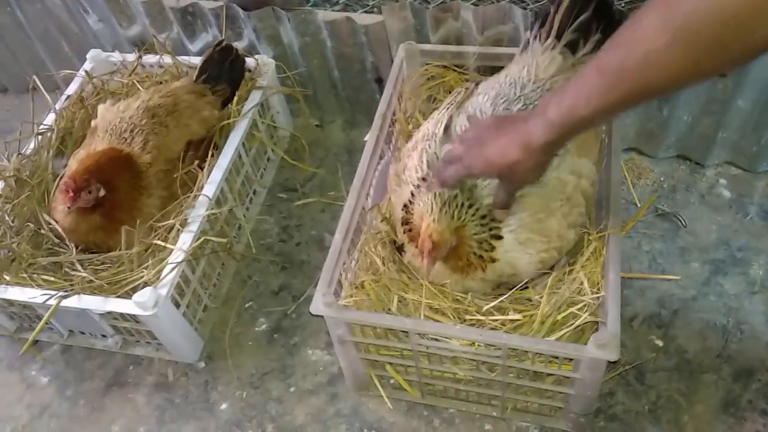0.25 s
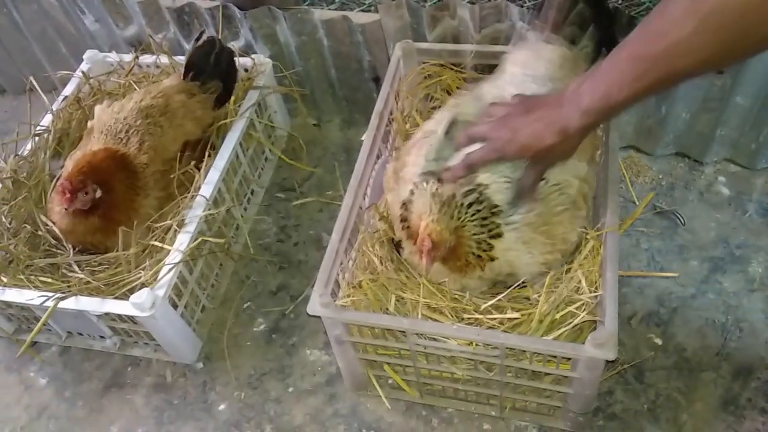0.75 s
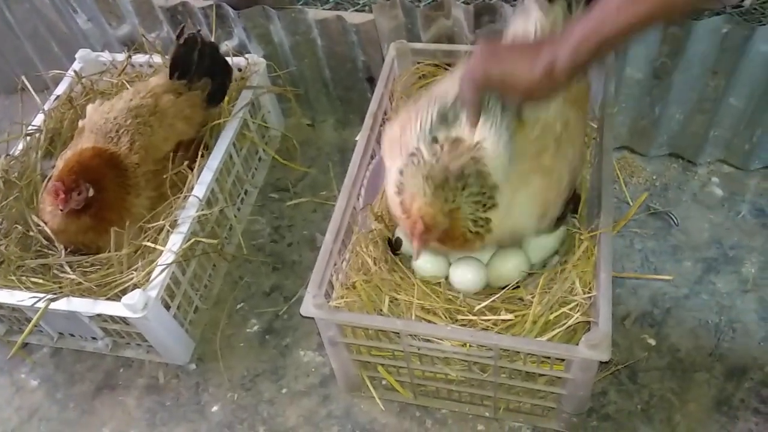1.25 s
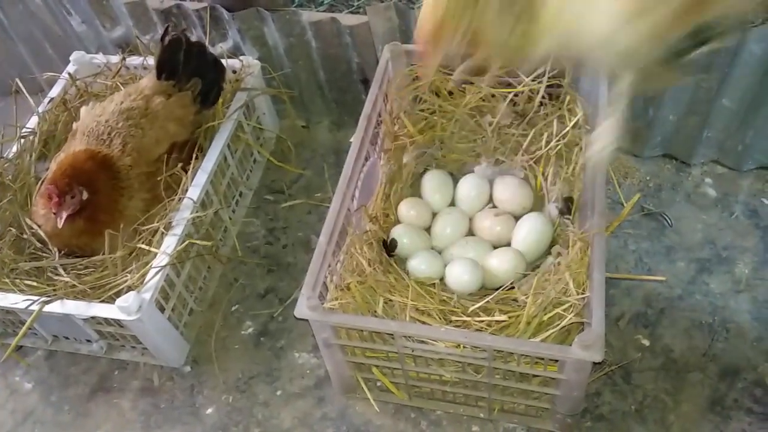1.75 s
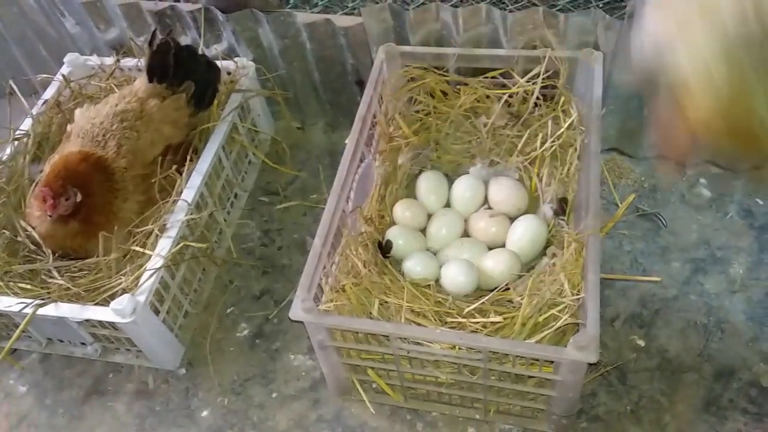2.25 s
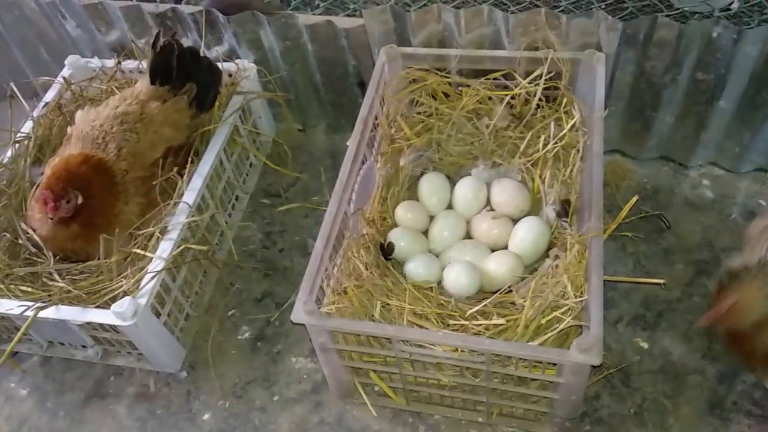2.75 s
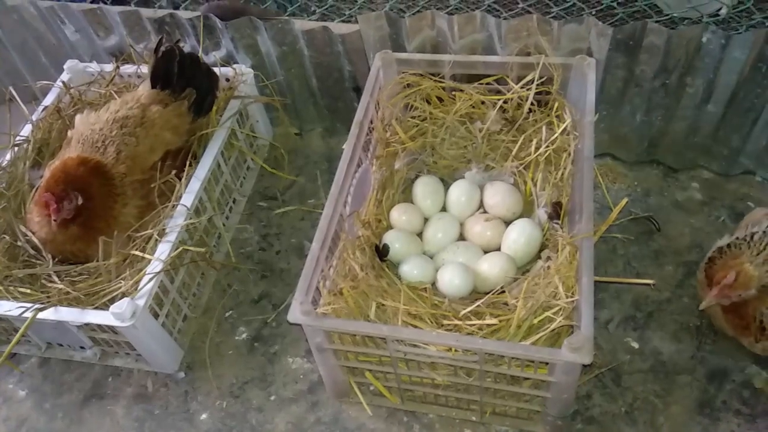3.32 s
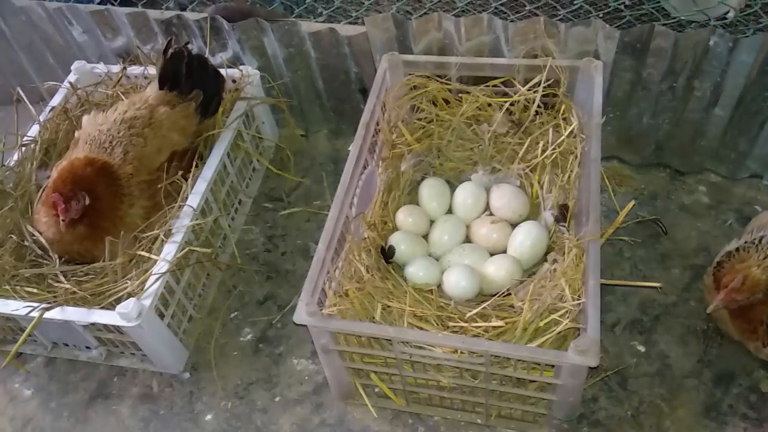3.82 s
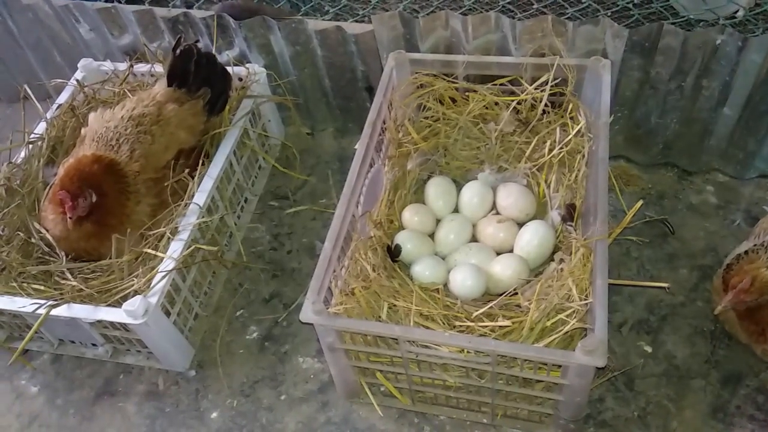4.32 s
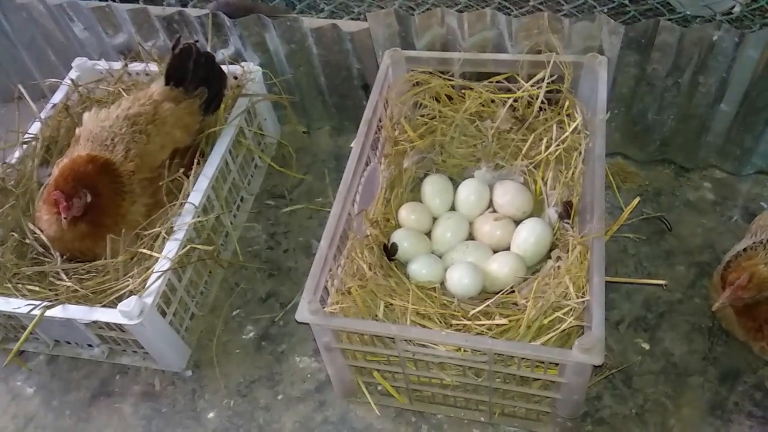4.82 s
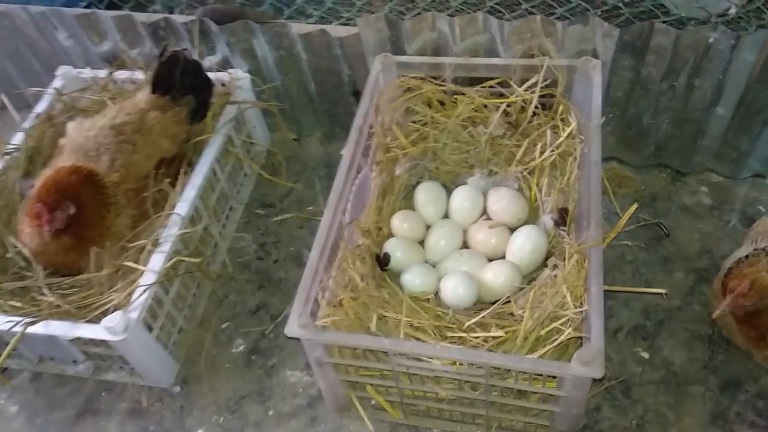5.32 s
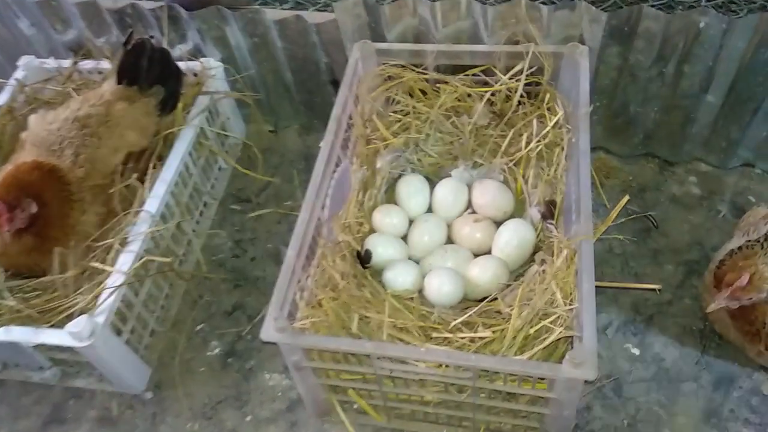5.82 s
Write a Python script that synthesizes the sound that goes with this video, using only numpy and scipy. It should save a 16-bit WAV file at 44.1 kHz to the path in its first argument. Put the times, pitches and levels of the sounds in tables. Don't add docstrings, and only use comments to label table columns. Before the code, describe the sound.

Loud cracking hen squawks for two seconds, then sparse quiet clucks under nonstop chick peeping, in an echoing sheet-metal shed.

```python
import sys
import numpy as np
from scipy import signal
from scipy.io import wavfile

SR = 44100
rng = np.random.default_rng(int(sys.argv[2]) if len(sys.argv) > 2 else 0)


def decibels_to_gain(level_db):
    exponent = np.asarray(level_db, float) / 20
    return 10 ** exponent


def inscribe(sig):
    pcm = np.round(np.clip(np.atleast_2d(sig).T, -1, 1) * 32767)
    wavfile.write(sys.argv[1], SR, pcm.astype(np.int16))


N = 267687

# time_s, pitch_hz, level_db
SQUAWKS = [
    [(0, 1745, -16), (.058, 1600, -13.5), (.095, 1512, -14.5), (.13, 1632, -12), (.18, 1486, -15.5),
     (.235, 1268, -19), (.27, 1248, -28), (.36, 1237, -24.5), (.41, 1197, -40)],
    [(.56, 1587, -35), (.61, 1577, -25), (.69, 1714, -29)],
    [(.835, 1148, -24), (.91, 1223, -23), (.945, 1418, -17.5), (.975, 1702, -14.5), (1.05, 1715, -18),
     (1.12, 1669, -17.5), (1.165, 1351, -20.5), (1.18, 1229, -26), (1.245, 1154, -32)],
    [(1.36, 1547, -27), (1.385, 1254, -22.5), (1.415, 780, -39)],
    [(1.53, 1528, -31), (1.58, 1759, -28.5), (1.625, 1924, -21), (1.69, 1900, -38), (1.76, 1700, -20.5),
     (1.815, 1785, -16.5), (1.852, 1357, -17), (1.87, 1273, -21), (1.94, 1280, -39)],
    [(1.98, 1689, -30), (2.02, 1694, -25), (2.1, 1640, -34), (2.13, 1288, -28), (2.22, 1203, -41.5)],
]
# hoarseness_at_top (0-1), crack_below_hz, flutter_per_s
HOARSENESS = [
    (.2, 1700, 28.5),
    (.3, 1500, 28),
    (.5, 1550, 60),
    (.2, 1300, 28),
    (.15, 1400, 28),
    (.5, 1400, 28),
]
# time_s, depth (0-1)
CATCHES = [(0.035, 0.19), (.072, 0.77), (.107, 0.87), (.143, 1), (0.167, 0.85), (0.191, 0.9), (0.223, 0.86),
           (0.251, 0.77), (0.287, 0.74), (0.316, 0.62), (.352, 0.65), (.62, 0.2), (.862, 0.8),
           (0.896, 0.68), (.925, 0.7), (0.976, 0.95), (1.002, 0.28), (1.023, 0.22), (1.055, 0.79),
           (1.074, 0.51), (1.093, 0.9), (1.129, 0.68), (1.151, 0.74), (1.188, 0.9), (1.214, 0.78),
           (1.765, 0.27), (1.861, 0.64), (1.895, 0.6), (2.061, 0.66), (2.109, 0.5), (2.162, 0.82)]
# centre_hz, width_hz, gain_db
BEAK_RESONANCE = (2780, 220, 2.2)
# time_s, peak_db, pitch_hz, upper_partials_db
CLUCKS = [(0.736, -32.5, 881, -18), (1.53, -42.5, 760, -18), (1.565, -43, 657, -18), (2.09, -32, 875, -17),
          (2.378, -27, 739, 3), (2.46, -32, 822, -18), (2.761, -30, 847, -18), (3.089, -35.5, 914, -3),
          (3.374, -36, 838, -22), (3.71, -36.5, 842, -20), (4.181, -36.5, 817, -22),
          (4.499, -37.5, 862, -1), (4.869, -41.5, 741, -8), (5.478, -37, 827, -3), (5.84, -33.5, 825, -18)]
# time_s, pitch_hz, level_db
FAR_MOAN = [
    (0.27, 321, -60),
    (0.384, 305.4, -46.5),
    (0.56, 229, -49),
]
# start_s, length_s, first_hz, level_db
RISING_PEEPS = [(.008, 0.04, 2720, -17.5), (.534, 0.11, 2610, -28.5), (.562, 0.073, 3720, -24),
                (.722, 0.16, 2437, -24), (.783, 0.13, 2423, -20.5), (.976, 0.082, 2797, -18.5),
                (1.037, 0.043, 3540, -19.5), (1.158, 0.093, 3015, -27), (2.621, 0.076, 2730, -21.5),
                (2.65, 0.1, 2270, -23.5), (2.87, 0.018, 2620, -12), (2.997, 0.11, 2900, -20.5),
                (3.55, .13, 3500, -23), (3.781, 0.072, 2864, -19.5), (3.814, 0.093, 3560, -29),
                (4.501, 0.12, 2267, -23.5), (4.841, 0.052, 2974, -19.5), (4.998, 0.097, 2580, -21),
                (5.067, 0.14, 2998, -19), (5.521, 0.088, 2524, -26.5), (5.673, 0.061, 2694, -22.5)]
# start_s, length_s, first_hz, level_db
FALLING_PEEPS = [(.005, 0.036, 3270, -20.5), (1.051, 0.13, 3000, -21.5), (1.097, 0.054, 3350, -23),
                 (1.443, 0.055, 3780, -21.5), (1.445, 0.074, 2730, -20.5), (1.453, 0.03, 3090, -16.5),
                 (1.502, 0.068, 3004, -19), (1.828, 0.074, 3030, -24), (2.102, 0.14, 2663, -26.5),
                 (2.115, 0.1, 3070, -21), (2.378, 0.022, 2830, -18.5), (2.406, 0.044, 3750, -19.5),
                 (2.47, 0.14, 3200, -24), (2.73, 0.039, 3063, -15.5), (3.141, 0.13, 2860, -20.5),
                 (3.322, 0.091, 3036, -16.5), (3.334, 0.069, 2750, -23), (3.374, 0.079, 3184, -20.5),
                 (3.48, 0.081, 3140, -23), (3.525, 0.027, 3170, -21), (3.564, 0.11, 3086, -18.5),
                 (3.63, 0.068, 4070, -26), (3.664, 0.062, 3250, -23), (4.02, 0.099, 2720, -24),
                 (4.371, 0.02, 2760, -15), (4.405, 0.1, 2840, -19), (5.159, 0.12, 2945, -20.5),
                 (5.409, 0.22, 2670, -28.5)]
# start_s, length_s, pitch_hz, level_db
LEVEL_PEEPS = [(.367, 0.025, 3270, -28), (.431, 0.024, 3210, -22), (1.525, 0.04, 3405, -18.5),
               (3.042, .039, 2740, -22.5), (3.163, 0.18, 3880, -26.5), (3.215, 0.023, 3190, -17),
               (3.25, 0.14, 2943, -19), (3.287, 0.098, 2580, -19), (3.596, 0.051, 2705, -27),
               (3.891, 0.22, 2960, -21), (4.34, 0.071, 3140, -18.5), (4.418, 0.064, 3786, -23.5),
               (4.477, 0.05, 3086, -11.5), (4.614, 0.091, 2737, -24), (4.947, 0.062, 2825, -23),
               (5.791, 0.14, 2935, -24.5), (5.969, 0.077, 2895, -19.5)]
# start_s, length_s, pitch_hz, level_db
CLEAR_PEEPS = [(0.035, 0.046, 2080, -24.5), (2.397, .022, 3460, -27), (2.144, 0.026, 2340, -23),
               (1.197, 0.052, 3340, -26), (3.03, 0.024, 3820, -27), (3.718, 0.047, 3490, -28),
               (3.862, 0.022, 2256, -24.5), (4.256, .022, 2690, -32), (4.303, .03, 4380, -30),
               (4.505, 0.11, 3480, -33), (5.452, 0.043, 3960, -33), (5.525, 0.036, 3490, -36),
               (5.66, 0.047, 4480, -30.5), (5.91, 0.044, 6200, -28), (5.993, 0.067, 3950, -30),
               (6.023, 0.031, 4070, -29)]
# start_s, level_db
PLUNGES = [
    (1.54, -22),
    (2.845, -21),
    (4.955, -16),
]
# start_s, length_s, second_partial_db
BRIGHT_PEEPS = [(0.24, 0.024, -10), (0.263, 0.075, -22.5), (0.366, 0.025, -13.5), (0.385, 0.045, -22),
                (0.431, 0.032, -16.5), (1.056, 0.082, -30.5), (1.314, 0.022, -13), (1.88, 0.041, -22),
                (2.568, 0.026, -21), (2.631, 0.046, -20.5), (2.723, 0.032, -19), (2.977, 0.076, -24.5),
                (4.254, 0.023, -8.5), (4.289, 0.061, -19.5), (4.833, 0.032, -20)]
# start_s, length_s, pitch_hz, level_db
HIGH_PEEPS = [(0.924, 0.077, 4260, -21.5), (1.143, 0.077, 4025, -20), (2.425, 0.064, 4465, -19.5),
              (2.902, 0.034, 5070, -14.5), (2.94, 0.034, 4950, -22), (4.177, 0.064, 4400, -29.5),
              (4.844, .044, 4120, -24), (4.874, 0.091, 4090, -22.5), (4.902, 0.038, 4130, -34)]
# start_s, length_s, pitch_hz, peak_db
PIPING = [
    (1.31, .2, 5750, -28),
    (2.03, .33, 5700, -35),
    (2.58, .08, 5680, -28),
    (3.26, .68, 5700, -34),
    (5.825, .07, 5700, -30),
]
# start_s, length_s, lowest_hz, level_db
BUZZES = [(0, 0.07, 5370, -19.5), (0.526, 0.053, 5410, -13), (0.641, 0.073, 5880, -11),
          (1.316, 0.005, 5600, -13), (1.375, 0.031, 5400, -43), (1.634, 0.12, 5410, -12.5),
          (1.838, 0.047, 5420, -22), (2.397, 0.04, 5900, -39), (2.586, 0.017, 5270, -15),
          (2.779, 0.023, 5620, -13), (3.262, 0.034, 5580, -19), (3.444, 0.0079, 5300, -20),
          (3.493, 0.012, 5350, -11), (3.835, 0.17, 6000, -44), (3.938, 0.054, 5020, -17),
          (4.223, 0.063, 5640, -22), (4.632, 0.089, 5040, -16.5), (4.797, 0.085, 6200, -21),
          (5.044, 0.11, 5710, -15.5), (5.61, 0.053, 5870, -19), (5.734, 0.12, 4580, -28),
          (5.889, 0.049, 5180, -24), (6.052, 0.032, 5600, -16)]
# start_s, length_s, pitch_hz, level_db
FURTHER_PEEPS = [(0.196, 0.082, 3015, -31), (0.231, 0.031, 6050.0, -28), (0.241, 0.1, 6810, -31.5),
                 (0.429, 0.056, 5870.0, -29), (0.603, 0.088, 2760, -32), (0.64, 0.038, 6760.0, -21),
                 (0.738, 0.052, 6900, -30), (0.804, 0.028, 2124, -25.5), (0.996, 0.052, 3060, -25),
                 (1.116, 0.049, 3150, -27), (1.257, 0.13, 5770, -27), (1.448, 0.063, 5250, -30),
                 (1.506, 0.044, 3110, -20.5), (1.595, 0.058, 5550, -29), (1.663, 0.07, 7700, -28),
                 (1.712, 0.094, 2150, -34), (1.787, 0.047, 5830, -26), (1.855, 0.059, 1910, -29),
                 (1.884, 0.079, 7100, -30), (2.396, 0.2, 9000, -30.5), (2.612, 0.058, 5440, -36),
                 (2.661, 0.075, 2150, -32), (2.727, 0.11, 9130, -28.5), (2.8, 0.038, 5960.0, -25),
                 (2.839, 0.024, 2820, -27), (2.889, 0.081, 4220.0, -33), (3.004, 0.14, 3750.0, -34),
                 (3.102, 0.06, 2800.0, -27), (3.187, 0.094, 2330.0, -29), (3.323, 0.071, 2220, -32),
                 (3.439, 0.031, 6080.0, -32), (3.593, 0.061, 3400, -27), (3.756, 0.019, 5660, -22.5),
                 (3.782, 0.14, 3680, -29), (3.856, 0.058, 2540, -27.5), (3.969, 0.039, 5620, -26.5),
                 (4.667, 0.13, 2900, -30), (4.67, 0.12, 5720.0, -26), (4.833, 0.095, 4540.0, -31),
                 (4.865, 0.078, 3650, -28), (4.867, 0.046, 6730, -27), (4.957, 0.046, 2390, -25),
                 (5.004, 0.031, 2330.0, -29), (5.039, 0.056, 3450, -25.5), (5.135, 0.023, 2940, -24),
                 (5.75, 0.11, 2960, -30), (5.811, 0.11, 2615, -29.5), (6.048, 0.017, 3155, -21)]
# start_s, length_s, pitch_hz, level_db
FAR_CACKLE = [
    (2.319, 0.032, 1600, -36),
    (3.0, 0.1, 1370, -49),
    (3.97, 0.064, 1500, -42),
    (4.261, 0.0085, 1300, -33.5),
    (4.559, 0.044, 1740, -30.5),
    (5.956, 0.11, 1350, -41),
]
# lowest_hz, commonest_hz, highest_hz
FLOCK_HZ = (2313, 2916, 4580)
# time_s, flock_db, rustle_db
CROWD = [(0, -32, -33.5), (.3, -39, -34), (.8, -23.5, -32.5), (1.1, -33, -28), (1.28, -30.5, -33),
         (1.5, -28, -27), (1.75, -28.5, -34), (2.05, -32, -27.5), (2.33, -34, -34.5), (2.5, -27, -29.5),
         (3.4, -28, -31.5), (3.65, -25.5, -30.5), (4.15, -28.5, -39), (4.55, -27.5, -34.5),
         (5.0, -27.5, -34.5), (5.35, -35, -43), (5.5, -28.5, -34), (6.07, -27, -33)]
# frequency_hz, density_db (per Hz)
RUSTLE_SPECTRUM = [(250, -38), (700, -13), (1500, -14), (2500, 1), (4500, 1), (6500, 1), (8500, -3.5),
                   (10000, -1.5), (12000, -8.5), (15500, -12.5)]
# frequency_hz, density_db (per Hz)
AIR_SPECTRUM = [(15, -42), (25, -10), (135, -12.5), (243, -6), (515, -7.5), (1550, -1), (2000, 8),
                (2600, -59), (4400, -120)]
# start_s, peak_db
GUSTS = [(0.56, -36), (0.958, -63), (1.15, -33), (1.418, -39), (1.661, -42), (2.405, -33), (2.76, -46),
         (3.01, -43), (3.262, -39), (3.567, -31.5), (4.23, -50), (4.423, -33.5), (4.655, -47),
         (4.826, -34.5), (5.051, -45), (5.452, -47)]
# time_s, level_db
TRAFFIC = [(0, -91), (2.5, -77), (2.57, -46), (2.68, -53), (2.75, -72), (4.4, -80), (4.5, -51.5),
           (4.9, -42), (5.25, -50.5), (5.33, -81), (6.07, -64)]


def in_time(rows):
    s, *columns = np.transpose(rows)
    return [np.interp(np.arange(N) / SR, s, c) for c in columns]


def rms_one(x):
    return x / np.sqrt(np.mean(x ** 2) + 1e-20)


def drift(rate_hz, count=N):
    pole, run_in = np.exp(-2 * np.pi * rate_hz / SR), round(SR / rate_hz)
    white = rng.standard_normal(count + run_in)
    return rms_one(signal.lfilter([1], [1, -2 * pole, pole * pole], white)[-count:])


def bandpass(x, low_hz, high_hz, order=2):
    return signal.sosfilt(signal.butter(order, [low_hz, high_hz], "band", fs=SR, output="sos"), x)


def highpass_hen(x):
    return signal.sosfilt(signal.butter(4, 200, "high", fs=SR, output="sos"), x)


def add(out, start_s, sound):
    i = round(start_s * SR)
    out[i:i + len(sound)] += sound[:N - i]


def note(rows, edge_s):
    s, *columns = np.transpose(rows)
    t = np.arange(s[0], s[-1], 1 / SR)
    gate = np.clip(np.minimum(t - s[0], s[-1] - t) / edge_s, 0, 1)
    return t, gate, [np.interp(t, s, c) for c in columns]


def partials(hz, levels_db):
    phase = 2 * np.pi * np.cumsum(hz) / SR
    tone = 0
    for k, db in enumerate(levels_db, 1):
        tone = tone + decibels_to_gain(db) * np.sin(k * phase) * (k * hz < SR / 2)
    return np.sqrt(2) * tone


def squawks():
    catch_s, recover_s, catch_drop, catch_loss_db = .006, .003, .2, 11.0
    rasp_db, spit_db = -4.0, -10.0
    out = np.zeros(N)
    for rows, (top_hoarse, crack_hz, flutter_hz) in zip(SQUAWKS, HOARSENESS):
        t, gate, (steady_hz, db) = note(rows, 0.003)
        n = len(t)
        jerk, spit = np.zeros(n), np.zeros(n)
        for s, depth in CATCHES:
            jerk += depth * np.exp(-((t - s) / np.where(t < s, catch_s, recover_s)) ** 2)
            spit += depth * np.exp(-((t - s - .006) / 0.0068) ** 2)
        hoarse = np.interp(steady_hz, [1250, crack_hz], [.82, top_hoarse])
        tremble = (0.006 + 0.075 * hoarse) * drift(212, n) + .03 * hoarse * drift(flutter_hz, n)
        hz = steady_hz * (1 - catch_drop * jerk + tremble)

        group_hz = steady_hz / 4 * (1 + .03 * drift(40, n))
        grouped = 1 + .4 * hoarse ** 1.5 * partials(group_hz, [0, 0])
        low_hz = steady_hz / 4 * (1 + .02 * drift(60, n))
        first = grouped * partials(hz, [3]) + 1.3 * hoarse ** 2 * partials(low_hz, [-40, -7, -9])
        first = signal.sosfilt(signal.butter(8, 1.08 * steady_hz.max(), fs=SR, output="sos"), first)
        breath = decibels_to_gain(-catch_loss_db * jerk + (1.5 + 2.5 * hoarse) * drift(68, n))
        voice = breath * (first + partials(hz, [-60, -14, -40, -48]))

        rasp = rms_one(bandpass(rng.standard_normal(n), 720, 1650, order=3))
        hiss = rms_one(bandpass(rng.standard_normal(n), 9800, 11300))
        rasp_amount = hoarse ** 2 + 0.77 * jerk + .5 * spit
        turbulence = decibels_to_gain(rasp_db + 1.8 * drift(87, n)) * rasp_amount * rasp + decibels_to_gain(spit_db) * spit * hiss
        add(out, t[0], gate * decibels_to_gain(db - 6.0) * (voice + turbulence))
    hz, width_hz, db = BEAK_RESONANCE
    out += decibels_to_gain(db) * signal.lfilter(*signal.iirpeak(hz, hz / width_hz, fs=SR), out)
    return highpass_hen(out)


def clucks():
    lead_in_db = -47
    out = np.zeros(N)
    t = np.arange(round(.08 * SR)) / SR - .036
    closed = np.exp(-((t + 0.016) / 0.025) ** 2)
    opened = np.clip((t + 0.0067) / 0.0024, 0, 1) * np.exp(-(np.maximum(t, 0) / 0.022) ** 5)
    for s, db, hz, upper_db in CLUCKS:
        glide = np.clip(1 + 14 * t, .5, 1) - 1.17 * np.maximum(t, 0)
        pitch_hz = hz / 2 * (glide + .075 * drift(400, len(t)))
        lead = decibels_to_gain(lead_in_db - db) * closed * partials(pitch_hz, [0, -6])
        voice = opened * partials(pitch_hz, [-20, 0, upper_db - 38, upper_db, -19, -16, -20, -11])
        add(out, s - .036, decibels_to_gain(db + 2.0) * (lead + voice))
    return out


def far_moan():
    out = np.zeros(N)
    t, gate, (hz, db) = note(FAR_MOAN, 0.025)
    add(out, t[0], gate * decibels_to_gain(db) * partials(hz, [0, -9, -3]))
    return highpass_hen(out)


def peep(length_s, first_hz, last_hz, second_db, third_db, wobble, warble):
    t = np.arange(round(length_s * SR)) / SR
    n = len(t)
    pulse = np.cumsum(140 * (1 + 0.2554 * drift(34.1, n))) / SR % 1
    scoop = 1 - 0.0937 * np.exp(-t / 0.00392)
    glide_hz = np.linspace(first_hz, last_hz, n)
    hz = glide_hz * (scoop + wobble * drift(149.4, n) + 0.24 * warble * (pulse - .5))
    edges = np.minimum(t / 0.0056, 1) * np.clip((length_s - t) / 0.012, 0, 1)
    fade = decibels_to_gain(1.65 * drift(57.0, n) - 22.4 * t)
    chopped = 1 - warble * np.cos(2 * np.pi * pulse)
    return edges * fade * chopped * partials(hz, [0, second_db, third_db, third_db - 15])


def near_peeps():
    out = np.zeros(N)
    for rows, glide_hz_per_s in [(RISING_PEEPS, 3800), (FALLING_PEEPS, -2200), (LEVEL_PEEPS, 0)]:
        for s, length_s, hz, db in rows:
            chance = rng.random()
            warble = .1 if db > -18 else .2 + .6 * chance
            last_hz = hz + glide_hz_per_s * length_s
            add(out, s, decibels_to_gain(db - 1.5) * peep(length_s, hz, last_hz, -40, -48, 0.017, warble))
    for s, length_s, hz, db in CLEAR_PEEPS:
        add(out, s, decibels_to_gain(db) * peep(length_s, hz, hz, -30, -40, .008, .12))
    for s, db in PLUNGES:
        add(out, s, decibels_to_gain(db) * peep(.05, 3350, 2300, -29, -40, 0.0243, 0.28))
    for s, length_s, db in BRIGHT_PEEPS:
        add(out, s, decibels_to_gain(db - 14) * peep(length_s, 3280, 3255, 13, 0, .008, .3))
    for s, length_s, hz, db in HIGH_PEEPS:
        second_db = -10 + 7 * (hz / 1000 - 4)
        add(out, s, decibels_to_gain(db - 2) * peep(length_s, hz, hz * .975, second_db, second_db - 14, 0.009, .18))
    return out


def piping():
    swell_db, fade_db = 2.0, 5.0
    out = np.zeros(N)
    for s, length_s, hz, peak_db in PIPING:
        track = [(s, peak_db - swell_db), (s + .25 * length_s, peak_db), (s + length_s, peak_db - fade_db)]
        t, gate, (db,) = note(track, 0.0044)
        wavering_hz = hz / 2 * (1 + .045 * drift(160, len(t)))
        level = decibels_to_gain(db - 15.5 + 5.15 * drift(34.5, len(t)))
        add(out, t[0], gate * level * partials(wavering_hz, [13.5, 21.5, -13.0, -34]))
    return out


def buzzes():
    sweep_span_hz = 1901
    out = np.zeros(N)
    for s, length_s, low_hz, db in BUZZES:
        t, gate, _ = note([(0, 0), (length_s, 0)], .016)
        n = len(t)
        sweep = np.cumsum(185 * (1 + .3 * drift(60, n))) / SR % 1
        ragged = np.clip(sweep + 0.173 * drift(90.3, n), -.12, 1.12)
        hz = (low_hz + sweep_span_hz * ragged) / 2
        pulses = np.sin(np.pi * sweep) ** 0.29 * decibels_to_gain(0.27 * drift(55, n))
        breath = bandpass(rng.standard_normal(n), 3500, 12000)
        voice = partials(hz, [-4.0, 12.0, 3.0, -22]) + decibels_to_gain(5.5) * breath
        add(out, s, decibels_to_gain(db - 16.5) * gate * pulses * voice)
    return out


def shed(x):
    t60_s = 0.23
    t = np.arange(round(.5 * SR)) / SR
    onset = np.clip(t / 0.0032 - 1, 0, 1)
    tail = rng.standard_normal(len(t)) * decibels_to_gain(-60 * t / t60_s) * onset
    return signal.fftconvolve(x, tail / np.sqrt(np.sum(tail ** 2)))[:N]


def further_birds():
    out = np.zeros(N)
    for s, length_s, hz, db in list(FURTHER_PEEPS) + list(FAR_CACKLE):
        add(out, s, decibels_to_gain(db) * peep(length_s + 0.012, hz, hz, -33, -36, 0.0169, 1220.0 / hz))
    return out + decibels_to_gain(-10) * shed(out)


def far_flock(count, centre_hz, second_db, warble_share):
    out = np.zeros(N)
    lowest_hz, _, highest_hz = FLOCK_HZ
    pitches_hz = [lowest_hz, centre_hz * .85, centre_hz * 1.12, highest_hz]
    for at, length, pitch, glide, size, warble in rng.random((count, 6)):
        hz = np.interp(pitch, [0, .2, .7, 1], pitches_hz)
        db = -10 * size - 14 * abs(np.log2(hz / centre_hz))
        last_hz = hz * (.9 + 0.1908 * glide)
        chop = warble_share * (0.32 + 0.62 * warble)
        call = peep(0.01773 + 0.0347 * length, hz, last_hz, second_db, second_db - 11.5, 0.0205, chop)
        add(out, at * N / SR, decibels_to_gain(db) * call)
    return rms_one(decibels_to_gain(-4.5) * out + shed(out))


def banded_noise(spectrum, patchy_db, patch_hz, together_share):
    out, together = 0, drift(patch_hz)
    edges_hz = 22 * 2 ** np.arange(0, 9.6, .5)
    white = rng.standard_normal((2, N))
    hz, db = np.transpose(spectrum)
    for k, (low, high) in enumerate(zip(edges_hz, edges_hz[1:])):
        level_db = np.interp(np.log(low * high) / 2, np.log(hz), db, left=-90, right=-90)
        if level_db < -50:
            continue
        flicker = together_share * together + drift(patch_hz)
        out = out + decibels_to_gain(level_db + patchy_db * flicker) * bandpass(white[k % 2], low, high)
    return rms_one(out)


def buzz_swell():
    t = np.arange(0, N, 64) / SR
    swell = np.zeros(len(t))
    for s, length_s, *_ in BUZZES:
        rise = np.clip((t - s + 0.0055) / 0.017, 0, 1)
        settle = np.exp(-np.maximum(t - s - length_s, 0) / .045)
        swell = np.maximum(swell, rise * settle)
    return 8.0 * np.interp(np.arange(N) / SR, t, swell)


def straw(rustle_db):
    crackle_db = 2.1 * drift(197)
    noise = banded_noise(RUSTLE_SPECTRUM, patchy_db=2.2, patch_hz=9, together_share=.3)
    return decibels_to_gain(rustle_db + crackle_db) * noise


def air(rustle_db):
    noise = banded_noise(AIR_SPECTRUM, patchy_db=4.0, patch_hz=8.75, together_share=0.3)
    return decibels_to_gain(-38 + 0.23 * (rustle_db + 38.5)) * noise


def wind():
    t = np.arange(N) / SR
    lumps = sum(decibels_to_gain(db - 10.0) * np.exp(-((t - s - .035) / 0.05) ** 2) for s, db in GUSTS)
    return lumps * rms_one(bandpass(rng.standard_normal(N), 35, 170))


def traffic():
    db, = in_time(TRAFFIC)
    return decibels_to_gain(db + 3.5 * drift(8.2)) * rms_one(bandpass(rng.standard_normal(N), 190, 430))


def scene():
    flock_db, rustle_db = in_time(CROWD)
    rustle_db = rustle_db + buzz_swell()
    hen = squawks() + clucks() + far_moan()
    chicks = near_peeps() + piping() + buzzes()
    echo = shed(decibels_to_gain(-9) * hen + decibels_to_gain(-5) * chicks)
    flock = decibels_to_gain(flock_db) * far_flock(620, FLOCK_HZ[1], second_db=-10.5, warble_share=0.95)
    shrill = decibels_to_gain(rustle_db - 2.0) * far_flock(220, 3516, second_db=1.5, warble_share=0.16)
    birds = hen + decibels_to_gain(-1.5) * chicks + echo + further_birds() + flock + shrill
    background = straw(rustle_db) + air(rustle_db) + wind() + traffic()
    return (birds + background)[None]


def band_limit(x):
    return signal.sosfilt(signal.butter(12, 15750, fs=SR, output="sos"), x)


def record(dry):
    rounded = 0.62 * np.tanh(dry / 0.62)
    mix = signal.sosfilt(signal.cheby2(10, 60, 17200, fs=SR, output="sos"), rounded)
    return band_limit(mix)


dry = scene()
out = record(dry)
inscribe(out)
```